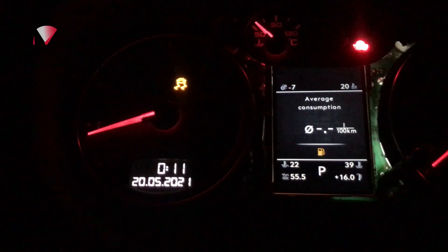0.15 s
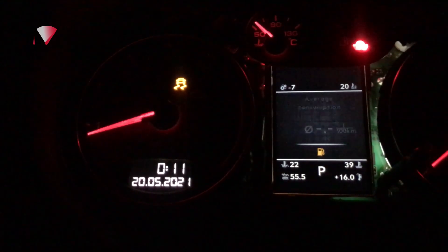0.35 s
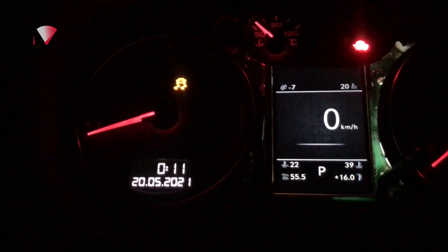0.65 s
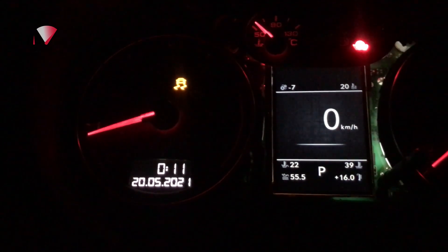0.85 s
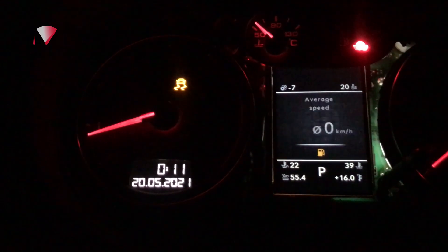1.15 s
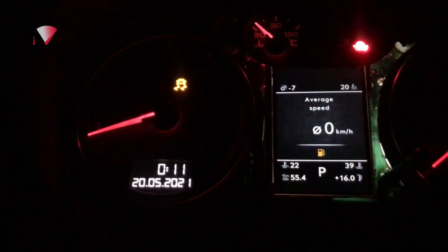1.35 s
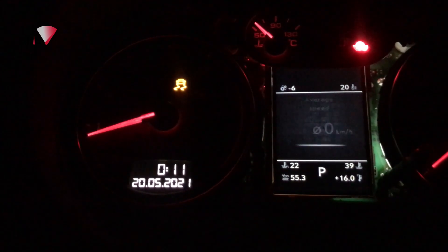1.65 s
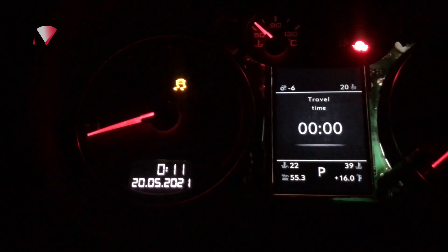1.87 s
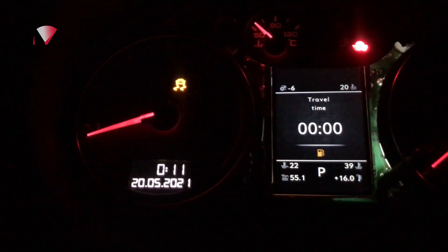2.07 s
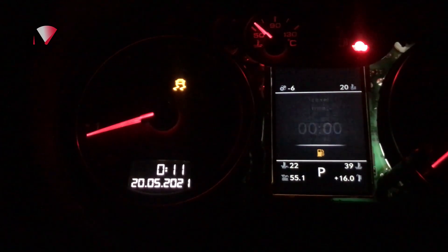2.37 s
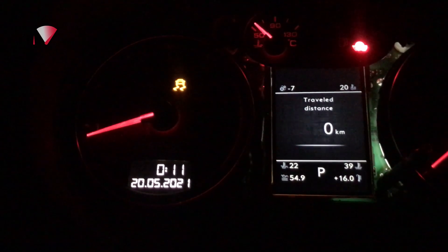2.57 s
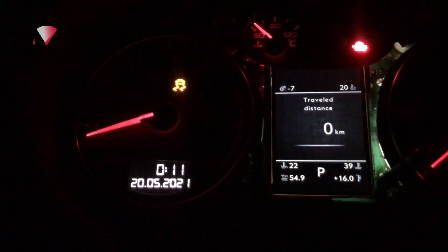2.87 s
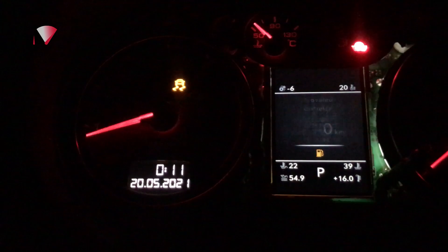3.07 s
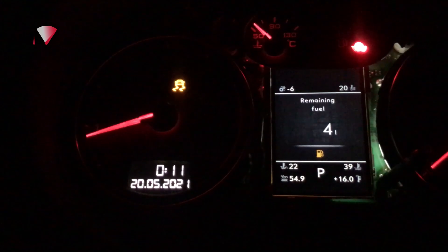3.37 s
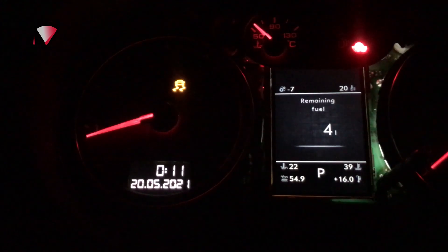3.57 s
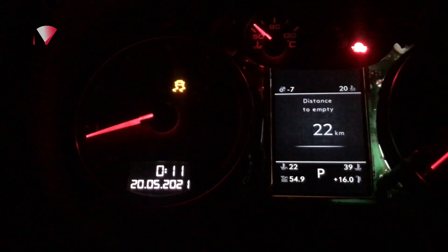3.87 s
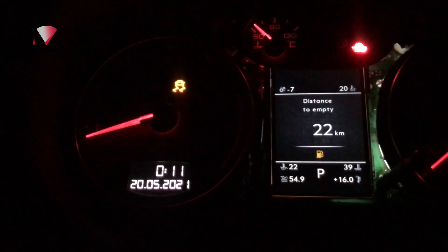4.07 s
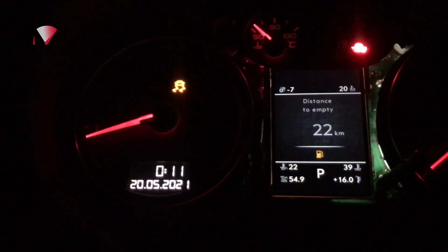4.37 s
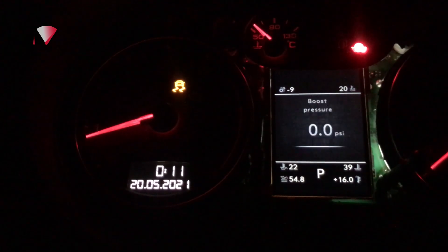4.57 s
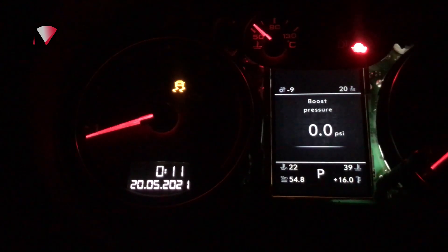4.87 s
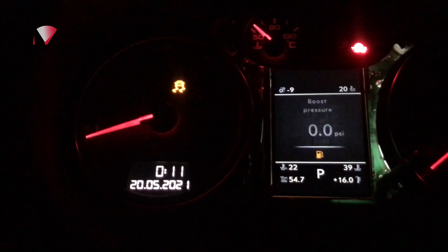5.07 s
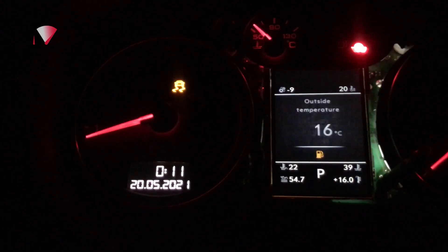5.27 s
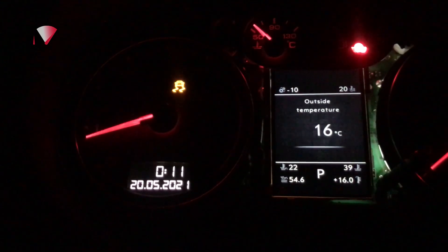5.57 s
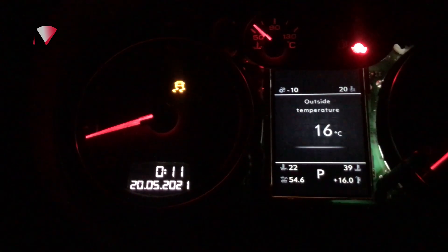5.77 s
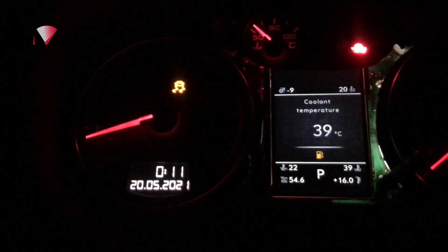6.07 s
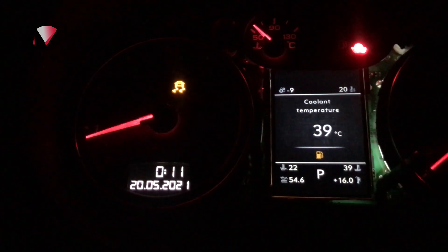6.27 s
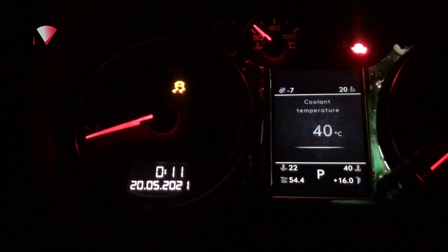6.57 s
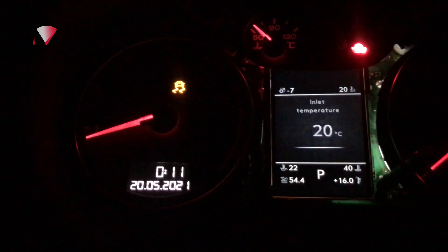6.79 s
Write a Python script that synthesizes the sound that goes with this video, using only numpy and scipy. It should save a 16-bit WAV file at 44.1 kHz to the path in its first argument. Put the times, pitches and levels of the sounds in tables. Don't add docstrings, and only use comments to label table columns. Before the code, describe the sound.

Inside a parked car, a small stalk button is pressed over and over with crisp plastic clicks, above a low throbbing engine idle.

```python
import sys
import numpy as np
from scipy import signal
from scipy.fft import rfft, irfft
from scipy.io import wavfile
from scipy.ndimage import uniform_filter1d

SR = 44100
rng = np.random.default_rng(int(sys.argv[2]) if len(sys.argv) > 2 else 0)


def store_pcm(level_fs):
    pcm = np.round(np.clip(level_fs, -1, 1) * 32767).astype(np.int16)
    wavfile.write(sys.argv[1], SR, np.atleast_2d(pcm).T)


def attenuation_scalar(level_db):
    decades = np.asarray(level_db, float) / 20
    return 10 ** decades


N = 305613

# pitch_hz, level_db [dB per Hz]
HISS_COLOUR = [(1700, -3), (2000, -1), (3200, -3), (4000, -6), (4950, -9.5), (5900, -7), (7600, -11),
               (9000, -8.5), (10400, -14), (12000, -7), (13800, -6), (15700, -0.5), (15900, -28)]
# pitch_hz, level_db [dB rms]
WHINES = [(5997, -101), (8748, -102), (9001, -97), (9249, -102), (13814, -103), (13867, -96), (15660, -101)]
# start_s, length_s, swell_db
SLEEVE_BRUSHES = [
    (-.1, 0.37, 2.5),
    (1.02, .36, 7),
    (1.7, 1.05, 2),
    (6.33, 0.31, 3),
]
# pitch_hz, level_db [dB per Hz]
BLOWER_COLOUR = [(28, -13.5), (60, -11.5), (110, -7), (190, -16.5), (290, -17), (350, -24.5), (395, -20.5),
                 (450, -26.5), (560, -23.5), (660, -28.5), (830, -34), (990, -30.5), (1100, -35.5),
                 (1700, -41)]
# time_s, firing_rate_hz
FIRING_RATE = [(0, 35.55), (0.75, 35.54), (1.25, 35.4), (1.75, 35.67), (2.25, 35.63), (3.25, 36.06),
               (4.75, 36.19), (5.75, 35.34), (6.25, 35.48), (6.93, 35.48)]
# multiple [of the two-turn engine cycle], level_db [dB rms]
CRANK_ORDERS = [(5, -67.5), (6, -45), (7, -55), (8, -69.5), (9, -51.5), (10, -73), (11, -62.5), (12, -56.5),
                (13, -59), (14, -72.5), (15, -81.5), (16, -81.5), (17, -79), (18, -57), (19, -57.5),
                (21, -65.5), (23, -68), (24, -76), (27, -71.5), (29, -66.5), (31, -64.5)]
# start_s, snap_db, cap_db
PRESSES = [(0.0394, -38, -43), (0.8283, -36, -44), (1.4896, -34.5, -44), (2.1049, -36, -43.5),
           (2.7879, -37.5, -41), (3.5387, -38.5, -43), (4.2589, -39, -42.5), (5.012, -39, -43),
           (5.778, -30.5, -52), (6.3029, -32.5, -45.5), (6.8093, -32.5, -42)]
# start_s, snap_db, cap_db
RELEASES = [(0.3004, -57.5, -50.5), (0.9767, -54.5, -53), (1.6691, -59.5, -55), (2.3214, -61, -56),
            (2.992, -64, -56), (3.7335, -63, -55), (4.4034, -66, -59), (5.2197, -64.5, -56),
            (5.9129, -60, -52.5), (6.4495, -44, -47.5)]
# start_s, thump_db, cap_db, snap_db, sizzle_db
THUMB_SHIFTS = [
    (0.095, -76, -78, -81, -82),
    (1.965, -62, -66, -76, -80),
    (5.08, -66, -76, -81, -70),
    (5.875, -74, -82, -86, -84),
    (5.933, -71, -59, -68, -72),
    (5.947, -74, -70, -72, -76),
    (6.278, -67, -72, -76, -66),
]
# pitch_hz, t60_s, press_db, release_db
STALK_MODES = [(262.5, 0.028, 6.5, 6.5), (396, 0.13, -11.5, -14), (498, 0.11, -19, -14.5),
               (607, 0.047, -6, 0.5), (668.2, 0.072, 4.5, 2.8), (767, 0.038, -1, -1),
               (891, 0.067, -9, -8.5), (976, 0.064, -10.5, -11), (1107, 0.047, -1, -4),
               (1237, 0.046, -12, -17.5), (1411, 0.02, 5, -2.5), (1510, 0.0072, -8, -28)]
CAP_MODES = [(2140, .022, 0, 0), (2400, .012, -7, -5)]
DOME_MODES = [(2860, 0.06, -8.5, 2), (3060, 0.036, -6, -1), (3227, 0.019, 1, 7), (3350, 0.016, -2.5, -1),
              (3750, 0.015, -5, 7.5), (3890, 0.015, 9.5, -3), (3966, 0.017, 7.5, 0)]
SIZZLE_MODES = [(5300, .007, -13, -16), (5900, .005, -15, -15), (7260, .009, 0, -3), (8400, .004, -3, -8),
                (9100, .004, -7, -9), (9950, .006, -5, -8), (11300, .003, -4, -6), (12400, .004, -2, -2),
                (13700, .004, 1, 0), (14600, .004, -3, -1), (15400, .008, -2, -2)]
# delay_s, level_db
DASH_ECHOES = [(.0003, 6), (.0007, -2.5), (.0012, 8), (.0017, -7.5), (.0022, -8), (.0045, -6)]
# low_hz, high_hz
STALK_RANGE = [330, 1640]
# delay_s, level_db, favoured_hz
THUMP_ROUTES = [(-.00052, 1, 1540), (.0071, -12, 915), (.01218, -5, 970), (.01248, -6, 580)]


def level(x, db):
    return x * attenuation_scalar(db) / np.sqrt(np.mean(x ** 2))


def unit_energy(x):
    return x / np.sqrt(np.sum(x ** 2))


def curve(table):
    return np.interp(np.arange(N) / SR, *np.transpose(table))


def walk(rate_hz):
    hold = int(SR / rate_hz)
    held = np.repeat(rng.standard_normal(N // hold + 1), hold)
    smooth = uniform_filter1d(uniform_filter1d(held, hold), hold)
    return 1.3 * smooth[:N]


def coloured(spectrum, low_hz, high_hz):
    hz = np.arange(1, N // 2 + 2) * SR / N
    point_hz, point_db = np.transpose(spectrum)
    gain = attenuation_scalar(np.interp(np.log(hz), np.log(point_hz), point_db))
    gain = gain * (hz >= low_hz) * (hz < high_hz)
    return irfft(rfft(rng.standard_normal(N)) * gain, N)


def brush(start_s, length_s):
    peak_s = start_s + 0.24 * length_s
    return curve([(start_s, 0), (peak_s, 1), (start_s + length_s, 0)])


def phone_noise():
    swell_db = sum(db * brush(start_s, length_s) for start_s, length_s, db in SLEEVE_BRUSHES)
    hiss = attenuation_scalar(.3 * swell_db) * coloured(HISS_COLOUR, 1700, 11500)
    hiss = hiss + attenuation_scalar(swell_db) * coloured(HISS_COLOUR, 11500, 16000)

    t = np.arange(N) / SR
    whine = sum(np.sqrt(2) * attenuation_scalar(db) * np.sin(2 * np.pi * hz * t) for hz, db in WHINES)

    first_s, gap_s, tick_db = .0922, .10241, -60
    ticks = np.zeros(N)
    at = (np.arange(first_s, N / SR, gap_s) * SR).astype(int)
    ticks[at] = attenuation_scalar(tick_db + 2.5 * rng.standard_normal(len(at)))
    bright_ticks = np.diff(ticks, 2, prepend=[0, 0])
    return level(hiss, -74) + whine + bright_ticks


def blower(turn):
    air = 0
    for low_hz in 1700 / 2. ** np.arange(1, 7):
        pulse = 1 + min(60 / low_hz, .5) * np.cos(2 * np.pi * 6 * turn)
        air = air + attenuation_scalar(0.78 * walk(5.5)) * pulse * coloured(BLOWER_COLOUR, low_hz, 2 * low_hz)
    air = signal.sosfilt(signal.butter(4, 28, "high", fs=SR, output="sos"), air)

    whistle_hz, width_hz = 1516, 42
    low_hz, high_hz = whistle_hz - width_hz, whistle_hz + width_hz
    whistle = coloured([(low_hz, -12), (whistle_hz, 0), (high_hz, -12)], low_hz, high_hz)
    return level(air, -53.5) + level(whistle, -82.5)


def engine(turn):
    mount_lag = .57
    out = 0
    for k, db in CRANK_ORDERS:
        flip = -1 if 45 < 6 * k < 75 else 1
        loudness = attenuation_scalar(db + .08 * k * walk(3))
        phase = 2 * np.pi * k * turn + mount_lag + .02 * k * walk(2)
        out = out + flip * loudness * np.cos(phase)
    return np.sqrt(2) * out


def cabin(x):
    t60_s, build_s, tail_db = 0.064, 0.0024, -16
    t = np.arange(SR // 6) / SR
    tail = rng.standard_normal(len(t)) * 1000. ** (-t / t60_s) * np.clip(t / build_s - 1, 0, 1)
    tail = signal.lfilter(*signal.butter(2, 1670, "high", fs=SR), tail)
    return x + attenuation_scalar(tail_db) * signal.fftconvolve(x, unit_energy(tail))[:N]


def ring(modes, column, bite_db=0):
    hz, t60_s, db = np.array(modes)[:, [0, 1, column]].T[:, :, None]
    level_chance, pitch_chance = rng.standard_normal((2, len(modes), 1))
    t = np.arange(SR // 8) / SR
    db = db + 2.06 * level_chance + bite_db * (hz > 3800)
    tone = np.sin(2 * np.pi * hz * (1 + .002 * pitch_chance) * t)
    return (attenuation_scalar(db) * 1000. ** (-t / t60_s) * tone).sum(axis=0)


def rub():
    start_s, length_s, rub_db = 5.45, 0.23, -81
    grains = rng.standard_normal(N) ** 3 * brush(start_s, length_s)
    singing = signal.fftconvolve(grains, ring(DOME_MODES, 2))[:N]
    return level(singing, rub_db + 10 * np.log10(length_s * SR / N))


def dash_echoes():
    echo = np.zeros(SR // 100)
    echo[0] = 1
    for k, (delay_s, db) in enumerate(DASH_ECHOES):
        echo[int(delay_s * SR)] += (-1) ** k * attenuation_scalar(db)
    return signal.sosfilt(signal.butter(4, 4350, fs=SR, output="sos"), echo)


def stalk_push(delay_s):
    length = int(0.00045 * SR)
    push = np.zeros(SR // 50)
    push[int(delay_s * SR):][:length] = np.hanning(length)
    push = -signal.sosfilt(signal.butter(3, STALK_RANGE, "band", fs=SR, output="sos"), push)
    routes = 0
    for route_s, db, hz in THUMP_ROUTES:
        favoured = signal.lfilter(*signal.iirpeak(hz, 2.2, fs=SR), push)
        routes = routes + attenuation_scalar(db) * np.roll(favoured, round(route_s * SR))
    return push + routes


def dome_rattle(bounce_db):
    rattle_s, bounce_s = .003, 0.0051
    t = np.arange(SR // 200) / SR
    rattle = rng.standard_normal(len(t)) ** 3 * (t < rattle_s) * np.exp(-.5 * t / rattle_s)
    rattle[0] = 9
    spectrum = rfft(rattle)
    rattle = irfft(spectrum / np.abs(spectrum) ** .6, len(t))
    return np.convolve(rattle, np.r_[1, np.zeros(int(bounce_s * SR)), attenuation_scalar(bounce_db)])


def strokes(rows, thump_db, sizzle_db, follow):
    usual_snap_db = np.median(rows, axis=0)[1]
    return [(start_s, thump_db, cap_db, snap_db, sizzle_db + follow * (snap_db - usual_snap_db))
            for start_s, snap_db, cap_db in rows]


def button(events, column, way, lead_s, lag_s, bounce_db, thump_db, cap_db, snap_db, sizzle_db):
    travel_s = .0008
    out = np.zeros(N + SR)
    echo = dash_echoes()
    push = stalk_push(lag_s + lead_s)
    gains_db = (thump_db, cap_db, snap_db, sizzle_db)
    _, _, _, usual_snap_db, usual_sizzle_db = np.median(events, axis=0)
    for start_s, *db in events:
        bite_db = 0.99 * (db[2] - usual_snap_db)
        rattle = dome_rattle(bounce_db - max(db[3] - usual_sizzle_db, 0))
        i = int((start_s + travel_s - lead_s) * SR)
        bodies = (STALK_MODES, CAP_MODES, DOME_MODES, SIZZLE_MODES)
        for modes, drive, part_db in zip(bodies, (push, echo, echo, rattle), np.add(db, gains_db)):
            y = np.convolve(ring(modes, column, bite_db), drive)
            out[i:i + len(y)] += way * attenuation_scalar(part_db) * unit_energy(y)
    return out[:N]


def scene():
    turn = .305 + np.cumsum(curve(FIRING_RATE)) / 6 / SR
    press = button(strokes(PRESSES, thump_db=-38, sizzle_db=-33.5, follow=.02),
                   column=2, way=-0.86, lead_s=0, lag_s=0.00115, bounce_db=-16.5,
                   thump_db=25.5, cap_db=22.0, snap_db=22, sizzle_db=18.5)
    release = button(strokes(RELEASES, thump_db=-41, sizzle_db=-59.3, follow=.6) + THUMB_SHIFTS,
                     column=3, way=0.94, lead_s=.0007, lag_s=.00089, bounce_db=4,
                     thump_db=25.0, cap_db=20.0, snap_db=24.5, sizzle_db=22)
    mix = phone_noise() + blower(turn) + engine(turn) + rub() + cabin(press + release)
    return mix[None]


def roll_off(x):
    return signal.sosfilt(signal.butter(12, 16820, fs=SR, output="sos"), x)


def record(dry):
    band = signal.sosfilt(signal.cheby2(8, 40, 16600, fs=SR, output="sos"), dry)
    return roll_off(band)


dry = scene()
out = record(dry)
store_pcm(out)
```